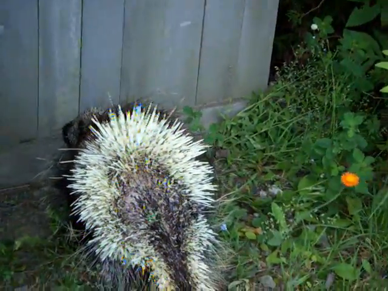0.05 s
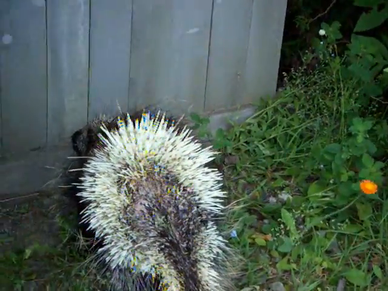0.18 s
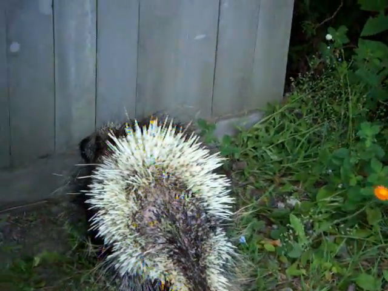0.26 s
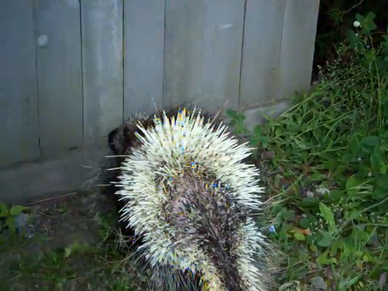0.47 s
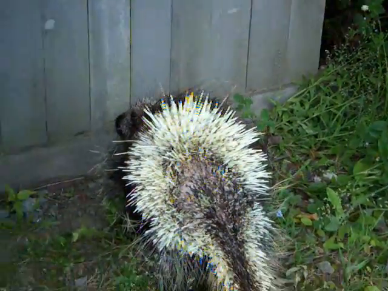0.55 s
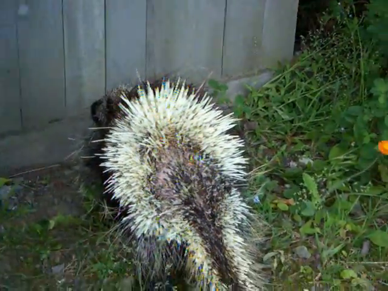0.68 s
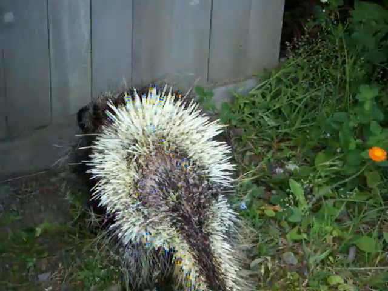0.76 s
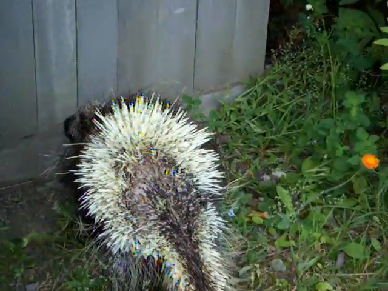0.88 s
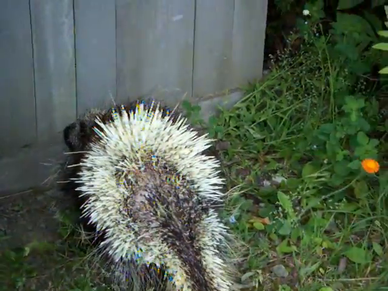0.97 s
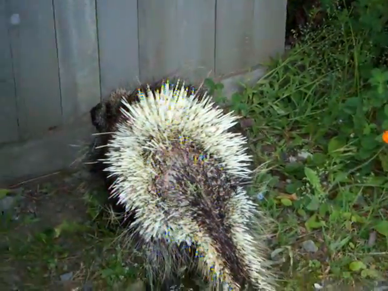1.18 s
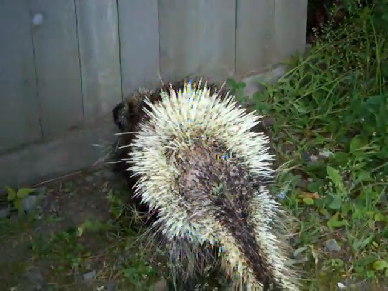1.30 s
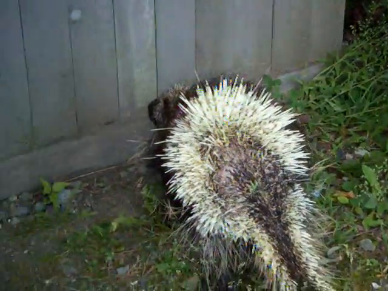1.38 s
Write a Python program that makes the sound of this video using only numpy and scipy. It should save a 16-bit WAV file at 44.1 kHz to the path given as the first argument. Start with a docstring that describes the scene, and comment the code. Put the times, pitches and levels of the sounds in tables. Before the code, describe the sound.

Close handling noises from a hand-held camera in a quiet garden. Two tiny ticks around 0.1 seconds lead into a sharp click and a dry pop at about 0.25 seconds. Near 0.8 seconds comes a hollow knock, followed at once by a brief rattle. Very faint distant birds whistle around 1 and 1.4 seconds. Soft outdoor hiss and a thin, high electronic whine continue throughout.

```python
"""A sharp click and a dry pop, led in by three tiny ticks; half a second later, a hollow knock and a rattle.
These are most likely the handling noises of a hand-held camera in a quiet garden. Each blow excites the damped
modes of the part it strikes, together with a burst of decaying noise; the pop is a pulse at the microphone.
Behind them lie faint distant birds, outdoor air, hiss and a thin electronic whine."""
import sys
import numpy as np
from scipy import signal
from scipy.fft import rfft, irfft
from scipy.io import wavfile

SR = 44100
rng = np.random.default_rng(int(sys.argv[2]) if len(sys.argv) > 2 else 0)


def digitize_waveform(pressure):
    """Quantize a signal to 16-bit integers and store it at the path in sys.argv[1].

    Rows of a 2-D input are taken as channels; values are limited to [-1, 1].
    """
    field = np.atleast_2d(pressure).T
    bounded = np.clip(field, -1, 1)
    quanta = np.round(bounded * 32767).astype(np.int16)
    wavfile.write(sys.argv[1], SR, quanta)


N = 63945
T = np.arange(N) / SR
HZ = np.fft.rfftfreq(N, 1 / SR)

# resonances of the clicking part: f/Hz, bandwidth/Hz, relative level/dB
STIFF_PART_RESONANCES = [(1516, 132, -2), (1720, 150, -7.5), (2400, 300, -7.5), (2933, 350, -1),
                         (4450, 136, -3.5), (4900, 170, -18), (5480, 210, -8.5), (6300, 500, -18),
                         (6940, 300, -8.5), (7170, 180, -10.5), (8600, 150, -24), (9380, 300, -26)]
# spectrum of the crunch inside the click: f/Hz, relative level/dB
CRUNCH_SPECTRUM = [(900, -28), (1500, -4), (3000, -1), (3700, -13), (4600, 3), (6000, -7), (7300, -3),
                   (8300, -8), (11000, -19)]
# spectrum of the chatter trailing the click: f/Hz, relative level/dB
CHATTER_SPECTRUM = [(200, -15), (350, 9), (800, 11), (1600, -3), (3000, -4), (5000, -15), (7500, -12),
                    (11000, -26)]
# modes of the hollow body: f/Hz, relative level/dB, T60/s
HOLLOW_BODY_MODES = [(740, 0.5, .064), (990, -9.5, 0.1), (2390, -27.5, 0.075), (4950, -24.5, .018),
                     (5630, -22, 0.016)]
# spectrum of the knock's contact noise: f/Hz, relative level/dB
CONTACT_SPECTRUM = [(100, 3), (350, 2), (600, -6), (1200, -12), (1800, -3), (3000, -6), (5500, -10),
                    (7000, -32), (11000, -34)]
# strikes of the loose part: t/s, level/dB
RATTLE_STRIKES = [(.7890, -29), (0.7907, -32), (0.7921, -35.5), (0.7937, -32), (0.7974, -34), (.8000, -33),
                  (.8040, -44)]
# modes of the loose part: f/Hz, relative level/dB, T60/s
LOOSE_PART_MODES = [(1152, -4, 0.05), (1424, -9.5, 0.041), (2303, -8, .03), (2395, -6.5, 0.039),
                    (2800, -11.5, 0.019), (4430, -15, .014), (4787, -13, 0.019), (7890, -11.5, .014)]
# spectrum of its scraping: f/Hz, relative level/dB
SCRAPE_SPECTRUM = [(200, -12.5), (800, 2.5), (1900, -6.5), (2600, 0), (3300, -22), (4300, -11),
                   (4800, -2.5), (5400, -17), (6900, -23), (8000, -9), (9000, -16), (11000, -21.5)]
# light ticks: t/s, level/dB
TICK_ONSETS = [(0.0644, -45.5), (0.1027, -45.5), (0.1114, -51)]
# spectrum of a tick: f/Hz, relative level/dB
TICK_SPECTRUM = [(1000, -9), (2500, -4.5), (4500, 2), (7500, 1.5), (11000, -14)]
# distant bird whistles: t/s, duration/s, start f/Hz, end f/Hz, level/dB
BIRD_WHISTLES = [(.945, 0.099, 2800, 2620, -70), (1.049, .09, 2680, 2800, -73),
                 (1.365, 0.111, 2290, 2470, -66)]
# electronic tones: f/Hz, rms level/dB, depth of the periodic dip (0 to 1)
WHINE_TONES = [(4690, -80, 0.2), (7291, -64, 0.96), (8076, -68, 0.04)]
# spectral density of outdoor air and microphone hiss: f/Hz, relative level/dB
AIR_SPECTRUM = [(20, 0), (45, -2), (75, 0), (130, -4), (200, -10.5), (380, -15.5), (570, -9.5),
                (690, -12.5), (820, -16), (1050, -13), (1550, -23), (2400, -22), (3600, -26.5), (6600, -28),
                (7200, -23), (7700, -25.5), (9000, -27), (11000, -34.5)]


def click(start=.2241):
    """Impulse response: a snap rings a stiff part and rebounds once, with noisy crunch and chatter."""
    power = sum(amp(db) ** 2 / (1 + ((HZ ** 2 - hz ** 2) / (width * hz)) ** 2)
                for hz, width, db in STIFF_PART_RESONANCES)
    bass_cut = 1 / np.sqrt(1 + (840 / (HZ + 1)) ** 4)  # second-order high-pass at 840 Hz
    snap = amp(17.5) * impulse(start, np.sqrt(power) * bass_cut)
    rebound = amp(-19) * np.interp(T - .002, T, snap)  # 2 ms later
    crunch = amp(-24) * noise(CRUNCH_SPECTRUM) * decay(start, t60=.015)
    chatter = amp(-36) * noise(CHATTER_SPECTRUM) * decay(start, t60=.033)
    return snap + rebound + crunch + chatter


def pop(start=.2512, length_s=.0005, band_hz=(42, 7100), swing_hz=70):
    """Transient response: a band-limited square pulse at the microphone, with a damped bass swing."""
    age = T - start
    square = np.clip(age * SR, 0, 1) - np.clip((age - length_s) * SR, 0, 1)
    pulse = signal.lfilter(*signal.butter(1, band_hz, "band", fs=SR), square)
    swing = decay(start, t60=.024) * np.cos(2 * np.pi * swing_hz * age)
    return amp(-19.5) * pulse + amp(-29.5) * swing


def knock(start=.76576):
    """Free vibration: a soft blow rings a hollow body, whose modes start flat and glide up to pitch."""
    body = amp(-18) * ring(start, HOLLOW_BODY_MODES, rise_s=.00051, flat=.099, settle_s=.0049)
    contact = amp(-41.5) * noise(CONTACT_SPECTRUM) * decay(start, t60=.034)
    return body + contact


def rattle():
    """Repeated impact: each strike of a settling loose part excites its modes and friction noise."""
    scrape = amp(-10) * noise(SCRAPE_SPECTRUM)
    out = np.zeros(N)
    for start, db in RATTLE_STRIKES:
        ringing = ring(start, LOOSE_PART_MODES, rise_s=.00057)
        out += amp(db) * (ringing + scrape * decay(start, t60=.021))
    return out


def ticks():
    """Exponential decay: bursts of bright noise die so fast that they are heard as tiny ticks."""
    envelope = sum(amp(db) * decay(start, t60=.016) for start, db in TICK_ONSETS)
    return noise(TICK_SPECTRUM) * envelope


def birds(blur_depth=.97, blur_hz=70.4):
    """Spectral broadening: random amplitude and phase blur gliding whistles, as heard from afar."""
    out = np.zeros(N)
    for start, length, from_hz, to_hz, db in BIRD_WHISTLES:
        progress = np.clip((T - start) / length, 0, 1)
        pitch_hz = from_hz + (to_hz - from_hz) * progress
        carrier = np.exp(2j * np.pi * np.cumsum(pitch_hz) / SR)
        blur = 1 + blur_depth * (drift(blur_hz) + 1j * drift(blur_hz))
        envelope = np.sqrt(abs(np.sin(np.pi * progress)))
        out += amp(db) * envelope * (carrier * blur).real
    return out


def whine(frame_hz=24, first_dip_s=.0122, dip_length_s=.009, edge_s=.0011):
    """Amplitude modulation: the camera's thin tones waver and dip once a frame, one almost to silence."""
    from_dip_s = abs(((T - first_dip_s) * frame_hz + .5) % 1 - .5) / frame_hz
    dip = np.clip((dip_length_s / 2 - from_dip_s) / edge_s + .5, 0, 1)
    out = np.zeros(N)
    for hz, db, depth in WHINE_TONES:
        waver = 1 + .06 * drift(rate_hz=23)
        tone = np.sqrt(2) * np.sin(2 * np.pi * hz * T)
        out += amp(db) * (1 - depth * dip) * waver * tone
    return out


def air():
    """Stationary noise: outdoor air and microphone hiss form a steady floor."""
    return amp(-54) * noise(AIR_SPECTRUM)


def ring(start, modes, rise_s, flat=0, settle_s=1):
    """Modal superposition: damped sines start low by the fraction `flat` and settle to pitch."""
    age = np.maximum(T - start, 0)
    clock = age - flat * settle_s * (1 - np.exp(-age / settle_s))
    attack = 1 - np.exp(-age / rise_s)
    return attack * sum(amp(db) * decay(start, t60) * np.sin(2 * np.pi * hz * clock)
                        for hz, db, t60 in modes)


def impulse(start, gain):
    """Minimum phase: folding the cepstrum gives a causal impulse with this gain at each frequency."""
    log_gain = np.log(np.maximum(gain, 1e-4))
    fold = (1 + np.sign(N / 2 - np.arange(N))) / (1 + (T == 0))
    cepstrum = irfft(log_gain, N) * fold
    return irfft(np.exp(rfft(cepstrum) - 2j * np.pi * HZ * start), N)


def decay(start, t60):
    """Exponential damping: a jump to one at start, then a fall of 60 dB every t60 seconds."""
    return (T >= start) * np.exp(-np.log(1000) * np.maximum(T - start, 0) / t60)


def noise(spectrum):
    """Spectral shaping: white noise coloured by rows of f/Hz, level/dB, at unit rms."""
    hz, db = np.transpose(spectrum)
    gain = amp(np.interp(np.log(HZ + 1), np.log(hz), db))
    return unit(irfft(rfft(rng.standard_normal(N)) * gain, N))


def drift(rate_hz):
    """Random fluctuation: low-pass noise of unit rms."""
    return unit(irfft(rfft(rng.standard_normal(N)) * np.exp(-(HZ / rate_hz) ** 2), N))


def amp(db):
    """Amplitude ratio of a level in decibels."""
    return 10 ** (np.asarray(db) / 20)


def unit(x):
    """Normalisation to unit rms."""
    return x / np.sqrt(np.mean(x ** 2) + 1e-20)


def scene():
    """Linear superposition: all sources add at one microphone."""
    return (ticks() + click() + pop() + knock() + rattle() + birds() + whine() + air())[None]


def record(dry, cutoff_hz=10880):
    """Band limiting: a steep low-pass filter removes the highest treble."""
    low_pass = signal.firwin(255, cutoff_hz, window=("kaiser", 8), fs=SR)
    return signal.oaconvolve(dry, low_pass[None], "same")


dry = scene()
out = record(dry)
digitize_waveform(out)
```